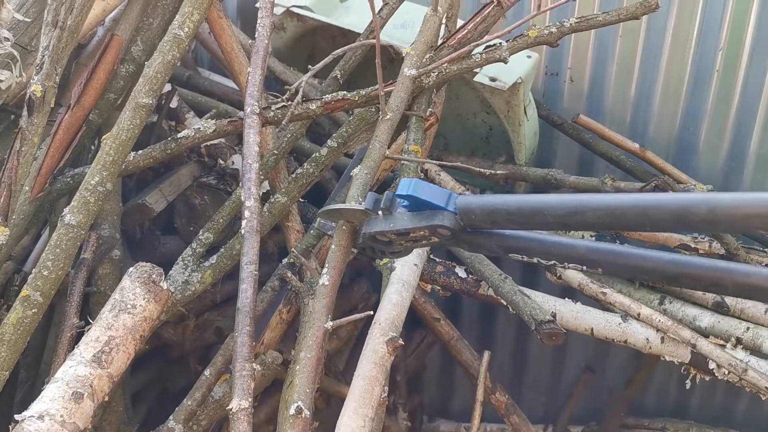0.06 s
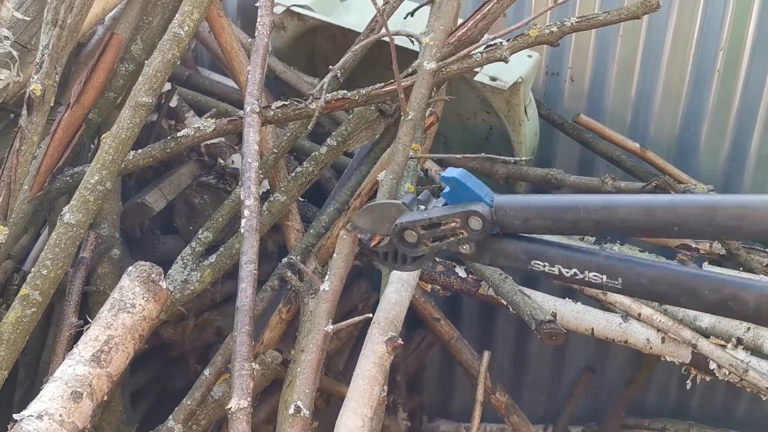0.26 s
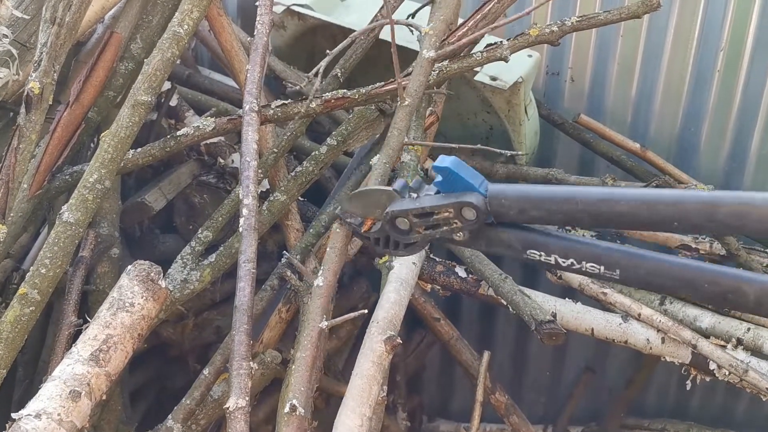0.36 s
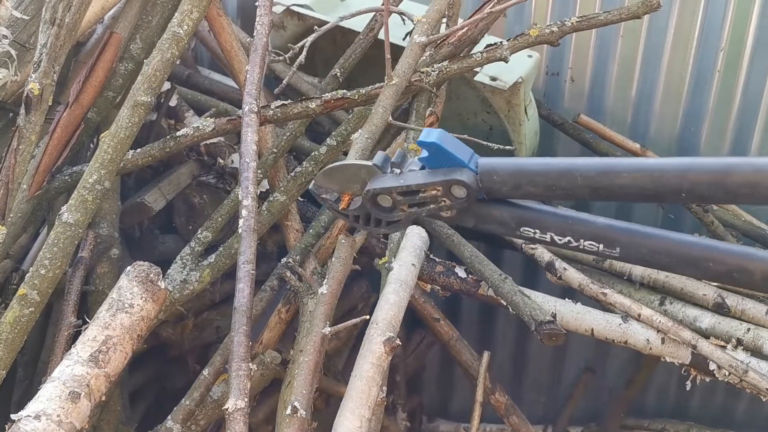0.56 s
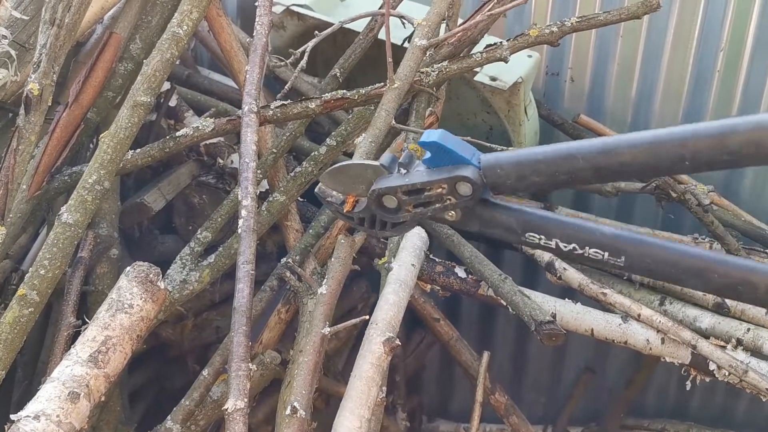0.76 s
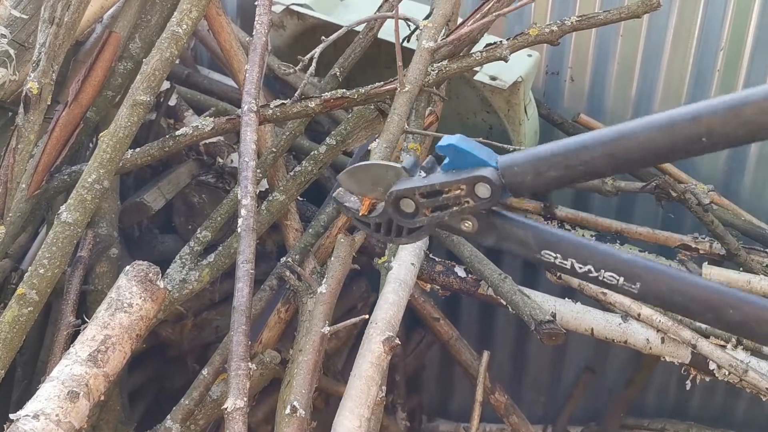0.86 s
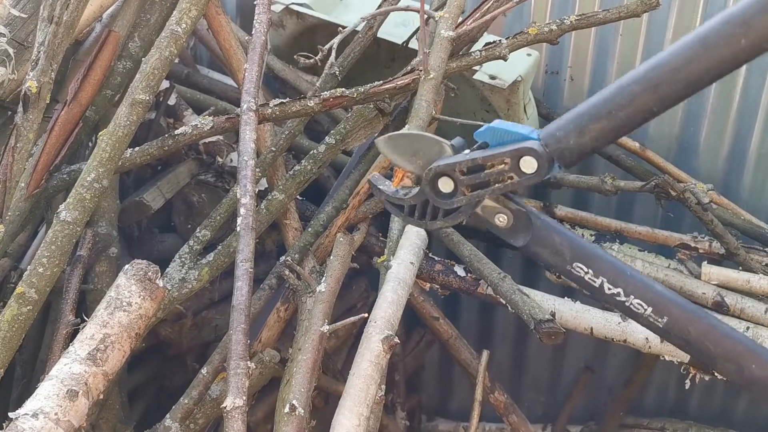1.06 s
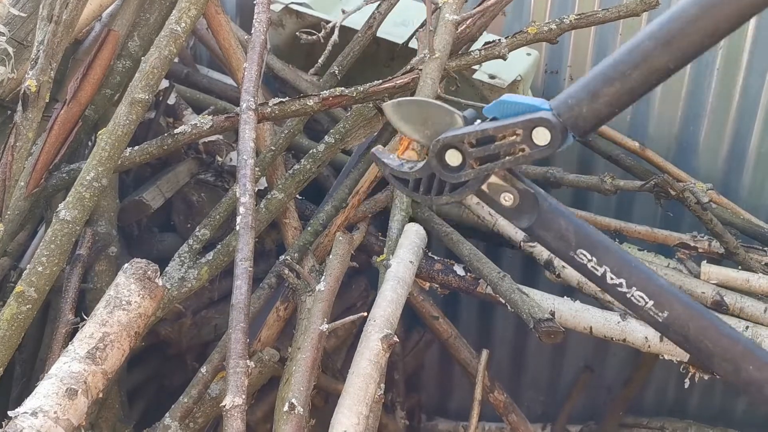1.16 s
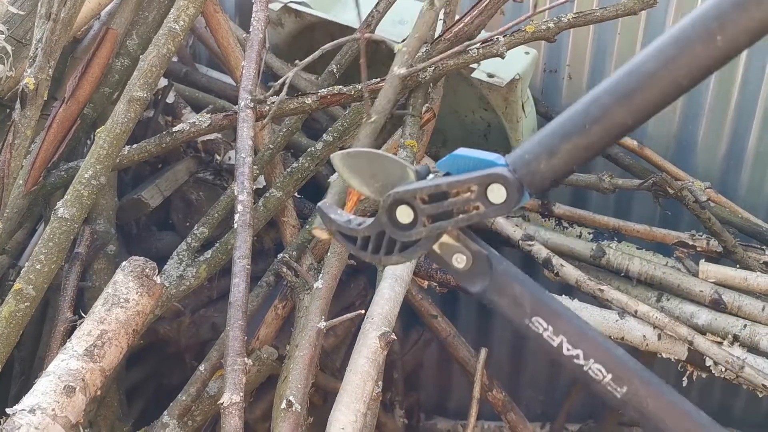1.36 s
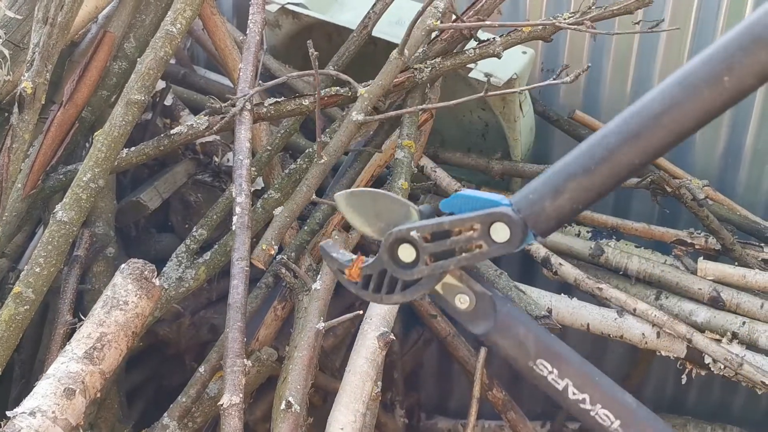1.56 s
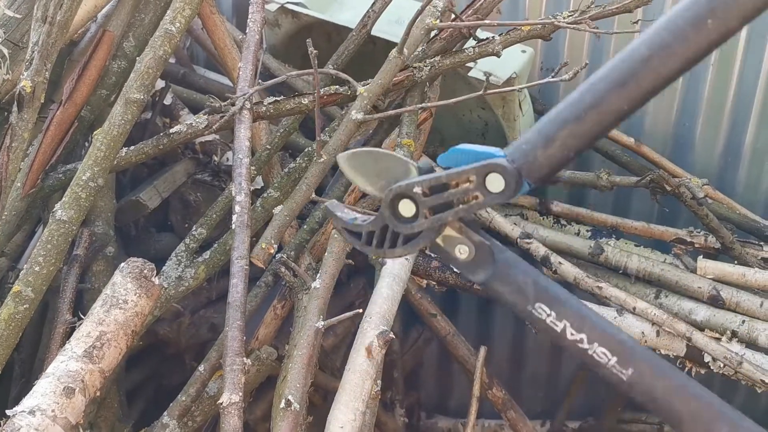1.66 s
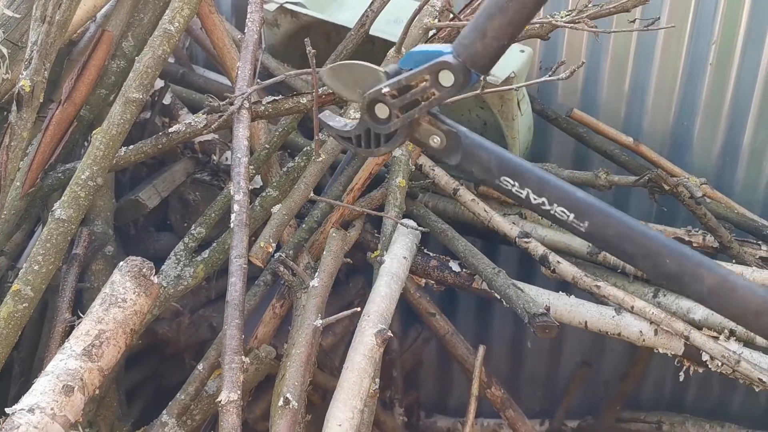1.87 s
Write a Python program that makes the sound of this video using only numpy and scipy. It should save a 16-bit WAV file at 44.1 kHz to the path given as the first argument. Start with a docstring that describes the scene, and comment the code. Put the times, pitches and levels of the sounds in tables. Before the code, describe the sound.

Loppers snap a branch with one loud, dry crack close to the microphone; the woodpile rumbles softly, bark flakes tick and scrape, then after a quiet gap a denser crackling scrape follows in a hushed yard.

```python
"""A quiet yard with a woodpile: long-handled loppers snap through a branch close to the microphone.
The wood cracks (noise bursts) and rings briefly (decaying sines), and the pile shifts with a low
rumble (swelling noise and hollow notes). The jaws open and scrape along the bark (grainy noise),
breaking small dry flakes off it (bright noise clicks). Behind lie a steady hush and puffs of air."""
import sys
import numpy as np
from scipy import signal
from scipy.fft import rfft, irfft, next_fast_len
from scipy.io import wavfile

SR = 44100
rng = np.random.default_rng(int(sys.argv[2]) if len(sys.argv) > 2 else 0)


def output_pcm(signal):
    """Save a mono or channel-first signal as 16-bit PCM at the path in sys.argv[1].

    Samples are clipped to [-1, 1] before scaling.
    """
    pcm = np.clip(np.atleast_2d(signal).T, -1, 1) * 32767
    wavfile.write(sys.argv[1], SR, np.round(pcm).astype(np.int16))


N = 83790
T = np.arange(N) / SR

# Colour of the yard's hush: (frequency [Hz], relative level [dB])
YARD_COLOUR = [(20, 23), (60, 10), (130, 9), (280, 6.5), (500, 2.5), (1000, -5), (1600, -7.5), (2400, -2),
               (4500, -.5), (7000, -3.5), (11000, -7), (13000, -11.5), (15500, -12.5)]
# How alike left and right are in the hush: (frequency [Hz], correlation [-1 to 1])
YARD_LIKENESS = [(40, 0.43), (130, 1), (500, .7), (1500, 0.14), (6000, 0.044)]
YARD_DB, YARD_PAN_DB = -58, 1  # the pan lifts the left and lowers the right

# Puffs of air on the microphone ports: (peak time [s], left level [dB], right level [dB])
AIR_PUFFS = [(0.1, -55, -66), (0.332, -44, -56), (0.495, -49, -53), (0.61, -52, -52), (0.66, -57.5, -55),
             (0.84, -59, -49), (1.05, -55.5, -68)]
PUFF_20DB_S = 0.077  # 20 dB rise and fall
# Colour of the puffs: (frequency [Hz], relative level [dB])
PUFF_COLOUR = [(15, -4.5), (40, 0), (75, 0), (140, -14), (400, -45)]

# How alike left and right are in the close sounds: (frequency [Hz], correlation [-1 to 1])
CLOSE_LIKENESS = [(60, 1), (150, 1), (500, 0.83), (1500, 0.43), (8000, 0.27)]

# The pile rocking: (peak time [s], 20 dB rise [s], 20 dB fall [s], level [dB])
PILE_JOLTS = [(0.212, 0.08, 0.26, -50), (0.374, 0.13, 0.14, -53), (0.59, .12, 0.11, -57),
              (1.47, 0.08, 0.17, -59), (1.569, 0.11, 0.03, -56), (1.625, 0.06, 0.03, -57)]
# Colour of the pile's rumble: (frequency [Hz], relative level [dB])
PILE_COLOUR = [(30, -14), (70, -4), (122, 1), (170, 0), (230, -5), (320, -5), (450, -13), (750, -13),
               (1200, -28), (3000, -50)]
# Cut branches bumping, each with a hollow note: (peak time [s], level [dB], pitch [Hz])
PILE_BUMPS = [(0.235, -51, 132), (0.365, -55, 280), (0.405, -51, 122), (0.535, -55, 130), (0.612, -58, 330),
              (0.62, -56, 122), (1.265, -63, 208), (1.46, -62, 340), (1.55, -54, 155), (1.575, -57, 342),
              (1.615, -51, 98), (1.71, -64, 205)]
BUMP_RISE_20DB_S, BUMP_FALL_20DB_S = .03, .08

# Decay of the tail from the woodpile and fence: (frequency [Hz], t60 [s])
ECHO_DECAY = [(150, .6), (800, .35), (2200, .28), (6000, 0.42), (14000, .3)]
RING_ECHO_DB, CRACK_ECHO_DB, BARK_ECHO_DB = -28, -11, -16

# Jaws and branches sliding over bark: (peak time [s], 20 dB rise [s], 20 dB fall [s],
# crackle level [dB], rasp level [dB], rasp centre [Hz])
BARK_SCRAPES = [(0.02, 0.3, 0.07, -53, -58, 3960), (0.245, .04, .2, -48, -56, 3800),
                (0.32, .05, 0.06, -53, -66, 3500), (0.367, .012, 0.0261, -46.5, -52.5, 3530),
                (0.48, .02, .04, -53, -64, 4000), (0.534, .022, .06, -41.5, -48, 3500),
                (0.605, 0.07, 0.11, -49, -58, 4000), (0.668, 0, 0.004, -49, -64, 5050),
                (1.117, .008, .018, -56, -58, 3000), (1.39, 0.05, 0.08, -49, -58, 4180),
                (1.44, .014, .04, -49, -52, 1900), (1.498, 0.0543, 0.04, -44, -55, 2700),
                (1.522, 0.04, .055, -42.5, -43, 3000), (1.606, 0.0445, 0.0334, -33.5, -45.5, 4930),
                (1.56, .12, .16, -68, -61, 650), (1.65, .04, .07, -51, -66, 4000)]
RASP_WIDTH_OCTAVES, RASP_SKIRT_DB = .44, -20  # bell width, and the floor added under the bell
CRACKLE_GRAINS_PER_S, CRACKLE_GRAIN_S, CRACKLE_SPREAD_DB = 2000, .0004, 4.5

# Dry flakes of bark snapping: (time [s], level [dB])
FLAKE_TICKS = [(0.0919, -48), (0.1416, -44.5), (0.3602, -36), (0.5222, -35), (0.5320, -32), (0.538, -35),
               (0.5566, -33.5), (0.5742, -34.5), (0.6063, -39.5), (0.6590, -34.5), (0.6798, -39),
               (0.6843, -30.5), (0.7018, -34.5), (0.7061, -40), (1.1133, -46), (1.1180, -41), (1.2160, -45),
               (1.2660, -51), (1.3703, -38), (1.3800, -43), (1.3880, -33.5), (1.4273, -42), (1.4441, -35),
               (1.4590, -39.5), (1.4797, -33), (1.4850, -35), (1.5696, -37), (1.5770, -34), (1.5908, -29),
               (1.6050, -29.5), (1.6145, -31), (1.622, -33.5)]
TICK_T60_S, TICK_TAIL_DB, TICK_TAIL_T60_S = .0045, -10, 0.048
# Colour of the dry flakes: (frequency [Hz], relative level [dB])
FLAKE_COLOUR = [(300, -32), (1300, -30), (2500, -24), (5000, -15), (7200, -7), (9500, -2.5), (11200, 1.5),
                (13000, -2), (15500, -6)]

# Fibres breaking in the cut: (time [s], strength driving both ring and crack [dB])
FIBRE_FRACTURES = [(0.2026, -32), (0.2032, -28), (0.2049, -9.5), (0.2059, -21), (0.2104, -26),
                   (0.2165, -34)]
# Modes of the branch in the jaws: (pitch [Hz], typical relative level [dB], t60 [s])
BRANCH_MODES = [(550, -23, 0.036), (757, -25, 0.027), (1395, -20.5, .02), (1588, -16, 0.0414),
                (1765, -13, 0.034), (2020, -16, .02), (2229, -18, .05), (2426, -18, .035),
                (2565, -12, 0.041), (2805, -16, .045), (3375, -23, 0.036), (4040, -24, .035)]
RING_DB, RING_PAN_DB, RING_LAG_S = -4.5, 1.8, .00015  # louder on the left, later on the right
PUSH_HZ, PUSH_DB, PUSH_S = 2100, -2, .0003  # the first jerk of the wood as it lets go
# Colour of the crack: (frequency [Hz], relative level [dB])
CRACK_COLOUR = [(200, -13), (550, -7), (850, -10), (1100, -18), (1800, -1), (3200, 1), (5500, -4),
                (9500, -1), (15000, -3)]
CRACK_DB, CRACK_T60_S, SPLINTER_DB, SPLINTER_T60_S = -5, 0.0071, -17, 0.049

# Colour of the left microphone port: (frequency [Hz], gain [dB])
LEFT_PORT_COLOUR = [(100, -0.5), (1000, 2), (2300, 2.5), (4300, -3), (5400, 0), (6500, -3.5), (7400, -4),
                    (8200, 5), (9300, 4), (11000, 8), (13200, 3), (14200, -4.5), (15500, 0)]
# Colour of the right microphone port: (frequency [Hz], gain [dB])
RIGHT_PORT_COLOUR = [(100, 0), (1200, -3), (2200, -4), (3000, -1), (3900, 1.5), (5000, -1), (7200, 2),
                     (7800, -4), (8700, -11), (12000, -12), (15000, -13)]
TOP_HZ = 16000


def amp(db):
    """Decibels to gain."""
    return 10 ** (np.asarray(db) / 20)


def unit(x):
    """Scale to rms 1."""
    return x / np.sqrt(np.mean(x ** 2) + 1e-20)


def along(points, hz):
    """Read (frequency, value) points on a log frequency axis."""
    f, v = np.transpose(points)
    return np.interp(np.log(hz + 1), np.log(f + 1), v)


def filtered(x, response):
    """Shape x by a response of frequency, padded so that nothing wraps round audibly."""
    m = next_fast_len(N + SR // 2)
    spectrum = rfft(x, m) * response(np.fft.rfftfreq(m, 1 / SR))
    return irfft(spectrum, m)[..., :N]


def causal(gain):
    """Minimum-phase response with this gain, by folding the cepstrum onto positive time."""
    cepstrum = irfft(np.log(np.maximum(gain, 1e-6)))
    half = cepstrum.shape[-1] // 2
    cepstrum[..., 1:half] *= 2
    cepstrum[..., half + 1:] = 0
    return np.exp(rfft(cepstrum))


def noise(colour, likeness):
    """Stereo noise of rms 1 with a given colour, its width set by the mid and side shares."""
    def mid_side_gain(hz):
        turn = np.arccos(np.clip(along(likeness, hz), -1, 1)) / 2
        return amp(along(colour, hz)) * [np.cos(turn), np.sin(turn)]

    mid, side = filtered(rng.standard_normal((2, N)), mid_side_gain)
    return unit(np.array([mid + side, mid - side]))


def fade(s, t60):
    """A sudden start at s that dies away by 60 dB in t60 seconds."""
    return (T >= s) * np.exp(-np.log(1000) * np.abs(T - s) / t60)


def swell(s, rise, fall):
    """A peak at s, 20 dB down at the rise time before it and the fall time after it."""
    return 10 ** -np.maximum((s - T) / rise, (T - s) / fall)


def grains(rate, life, spread_db):
    """Envelope of rms 1: tiny slips of random size at random times, each dying away."""
    sizes_db = spread_db * np.clip(rng.standard_normal(N), -2, 2)
    slips = (rng.random(N) < rate / SR) * amp(sizes_db) ** 2
    power = signal.lfilter([1], [1, -np.exp(-2 / (life * SR))], slips)
    return unit(np.sqrt(power))


def air():
    """The steady hush of the yard, and light puffs of air that buffet the ports in the bass."""
    hush_gain = amp([[YARD_DB + YARD_PAN_DB], [YARD_DB - YARD_PAN_DB]])
    hush = hush_gain * noise(YARD_COLOUR, YARD_LIKENESS)
    puffs = sum(amp([[left], [right]]) * swell(s, PUFF_20DB_S, PUFF_20DB_S)
                for s, left, right in AIR_PUFFS)
    return hush + puffs * noise(PUFF_COLOUR, [(50, .2)])


def pile():
    """The stacked branches rumble when the cut and the jaws jolt them, and some bump together."""
    power = sum((amp(db) * swell(s, rise, fall)) ** 2 for s, rise, fall, db in PILE_JOLTS)
    rumble = np.sqrt(power) * noise(PILE_COLOUR, CLOSE_LIKENESS)
    notes = np.zeros(N)
    for s, db, hz in PILE_BUMPS:
        envelope = amp(db) * swell(s, BUMP_RISE_20DB_S, BUMP_FALL_20DB_S)
        notes += envelope * np.sin(2 * np.pi * hz * (T - s))
    return rumble + np.sqrt(2) * notes  # root two makes the bump levels rms


def echo(x):
    """The woodpile and the fence scatter a short tail: noise decaying at a rate set by pitch."""
    hz, t, z = signal.stft(rng.standard_normal((2, SR // 2)), SR, nperseg=256)
    decay = np.exp(-np.log(1000) * t / along(ECHO_DECAY, hz)[:, None])
    tail = signal.istft(z * decay, SR, nperseg=256)[1]
    return signal.fftconvolve(x, tail / np.linalg.norm(tail[0]), axes=1)[:, :N]


def scrapes():
    """Each slide crackles in the treble and rasps in a band of the wood, both in tiny slips."""
    slips = grains(CRACKLE_GRAINS_PER_S, CRACKLE_GRAIN_S, CRACKLE_SPREAD_DB)
    crackle = slips * noise(FLAKE_COLOUR, CLOSE_LIKENESS)
    rub = noise([(300, -9), (1500, -0.5), (6000, 0.5), (12000, -7.5)], CLOSE_LIKENESS)
    rub = rub * grains(rate=2500, life=.0008, spread_db=4)
    out = np.zeros((2, N))
    for s, rise, fall, crackle_db, rasp_db, centre_hz in BARK_SCRAPES:
        def band(hz):
            octaves = np.log2((hz + 1) / centre_hz)
            return np.exp(-.5 * (octaves / RASP_WIDTH_OCTAVES) ** 2) + amp(RASP_SKIRT_DB)

        rasp = unit(filtered(rub, band))
        out += swell(s, rise, fall) * (amp(crackle_db) * crackle + amp(rasp_db) * rasp)
    return out


def ticks():
    """Single flakes of bark break with a sharp, bright click and a weaker, longer tail."""
    power = np.zeros(N)
    for s, db in FLAKE_TICKS:
        click = fade(s, TICK_T60_S) + amp(TICK_TAIL_DB) * fade(s, TICK_TAIL_T60_S)
        power += (amp(db) * click) ** 2
    return np.sqrt(power + 1e-20) * noise(FLAKE_COLOUR, CLOSE_LIKENESS)


def branch_ring(t):
    """One fracture sets the wood's modes ringing, with a short jerk at the start."""
    hz, db, t60 = np.transpose(BRANCH_MODES)[:, :, None]
    # each fracture strikes the modes a little differently
    sizes = amp(db + rng.normal(0, 1, db.shape)) * rng.choice([-1, 1], db.shape)
    modes = sizes * np.sin(2 * np.pi * hz * t) * np.exp(-np.log(1000) * t / t60)
    ring = np.sum(modes, axis=0) * (1 - np.exp(-t / PUSH_S))
    push = t / PUSH_S * np.exp(1 - t / PUSH_S) * np.cos(2 * np.pi * PUSH_HZ * t)
    return ring + amp(PUSH_DB) * push


def snap():
    """The branch gives way in a few quick fractures; each cracks and rings the wood."""
    t = np.arange(SR // 5) / SR
    ring, burst_power = np.zeros((2, N)), np.zeros(N)
    for s, level in FIBRE_FRACTURES:
        struck = branch_ring(t)
        ring[0, round(s * SR):][:len(t)] += amp(level + RING_PAN_DB) * struck
        ring[1, round((s + RING_LAG_S) * SR):][:len(t)] += amp(level - RING_PAN_DB) * struck
        burst = amp(CRACK_DB) * fade(s, CRACK_T60_S) + amp(SPLINTER_DB) * fade(s, SPLINTER_T60_S)
        burst_power += (amp(level) * burst) ** 2
    crack = np.sqrt(burst_power + 1e-20) * noise(CRACK_COLOUR, CLOSE_LIKENESS)
    crack = crack * grains(rate=9000, life=.0005, spread_db=2)
    tail = echo(amp(RING_ECHO_DB) * ring + amp(CRACK_ECHO_DB) * crack)
    return amp(RING_DB) * ring + crack + tail


def scene():
    """The yard, the pile, the bark and the cut together."""
    bark = ticks() + scrapes()
    return air() + pile() + bark + amp(BARK_ECHO_DB) * echo(bark) + snap()


def record(dry):
    """The left port is bright and the right one dull; nothing passes above the band limit."""
    hz = np.fft.rfftfreq(2048, 1 / SR)
    gains = amp([along(LEFT_PORT_COLOUR, hz), along(RIGHT_PORT_COLOUR, hz)])
    ports = irfft(causal(gains))
    coloured = signal.fftconvolve(dry, ports, axes=1)[:, :N]
    return filtered(coloured, lambda hz: hz < TOP_HZ)


dry = scene()
out = record(dry)
output_pcm(out)
```